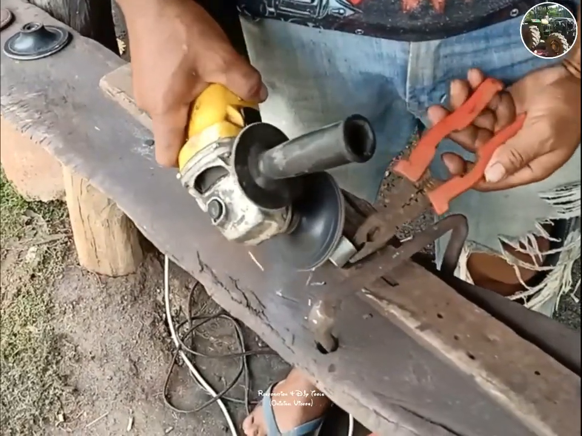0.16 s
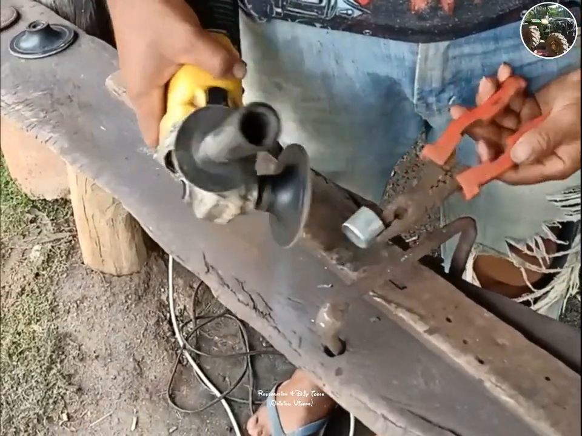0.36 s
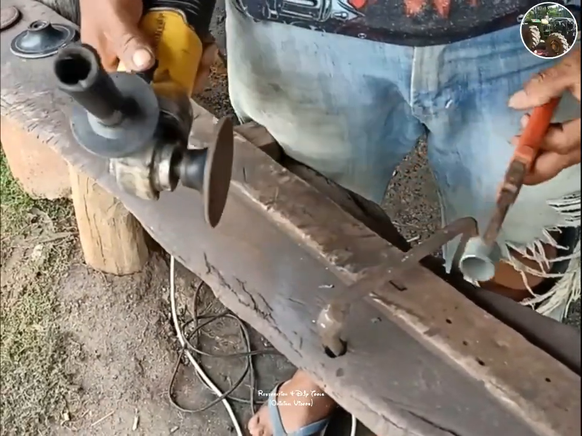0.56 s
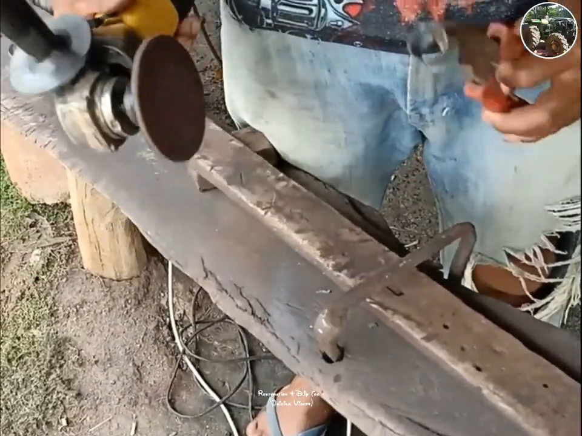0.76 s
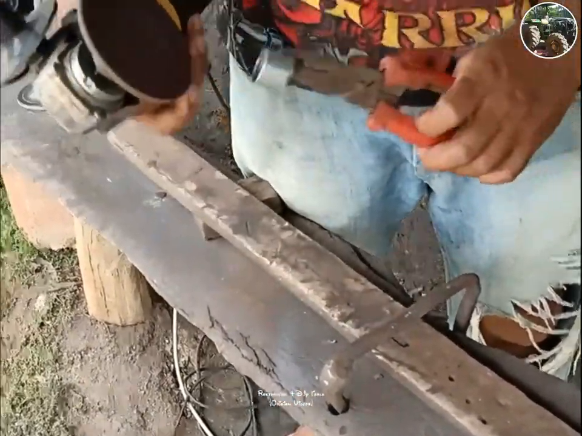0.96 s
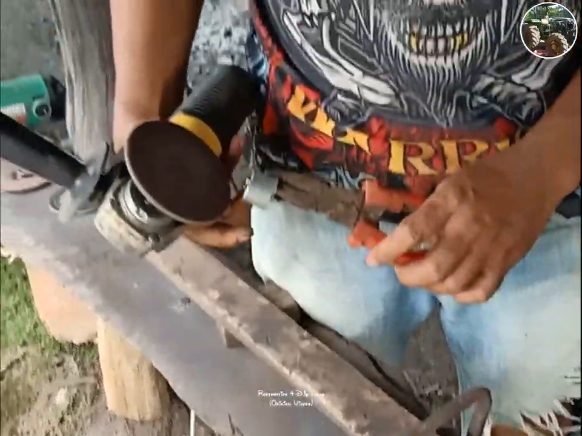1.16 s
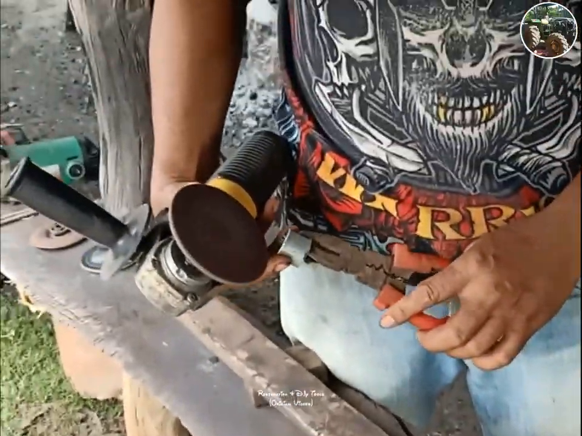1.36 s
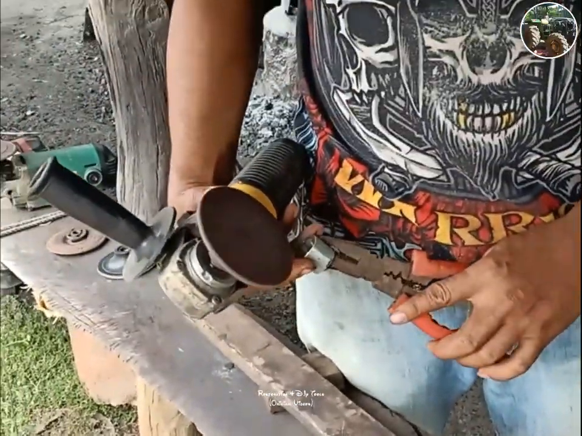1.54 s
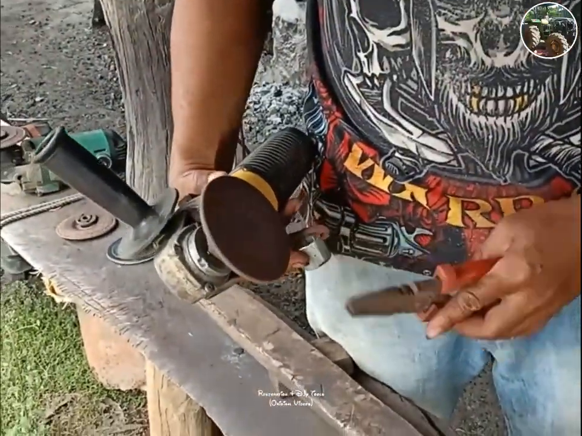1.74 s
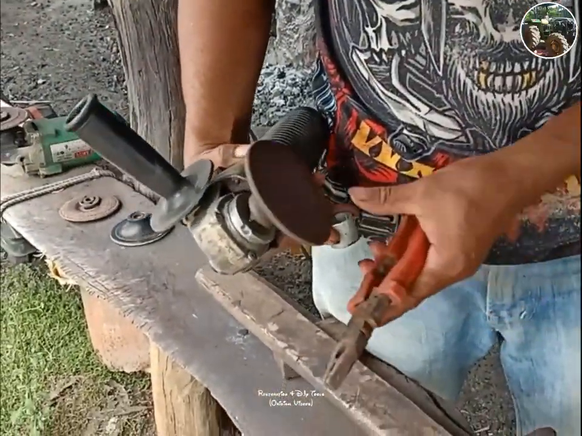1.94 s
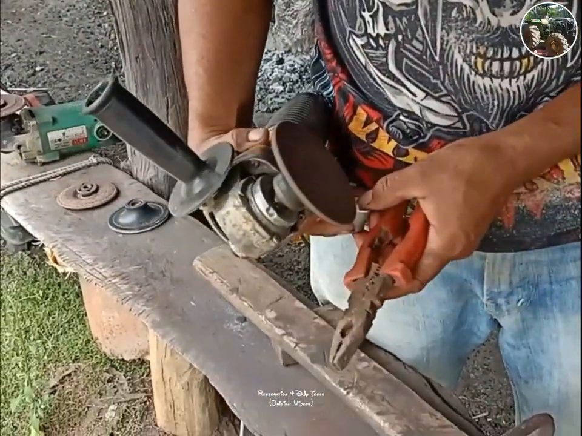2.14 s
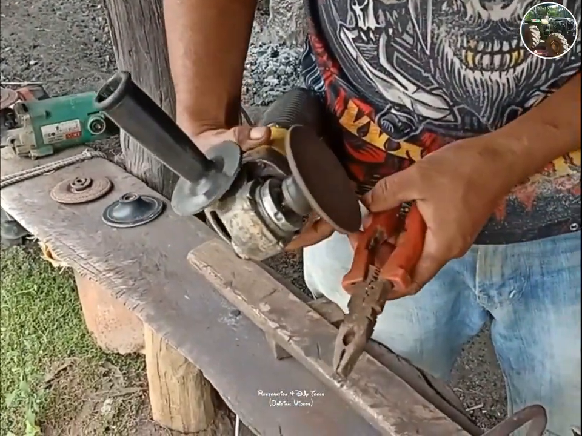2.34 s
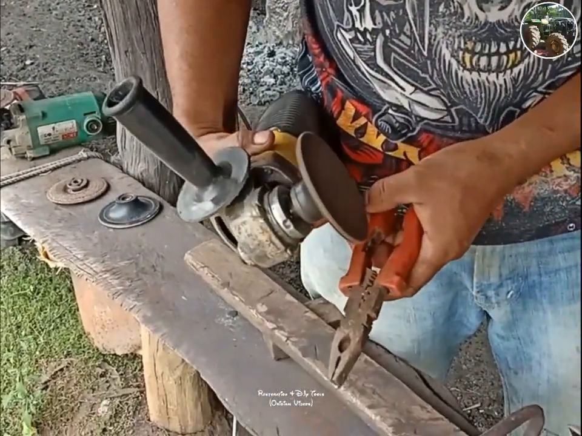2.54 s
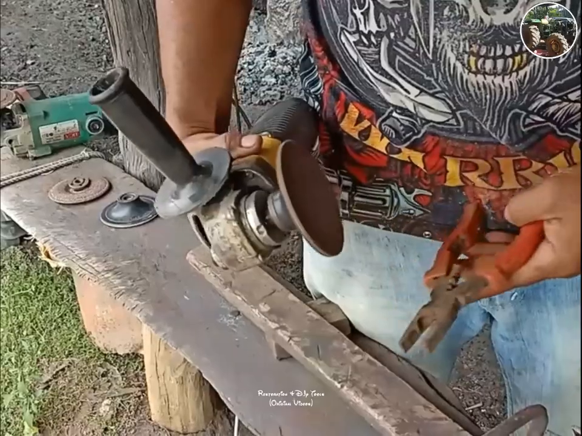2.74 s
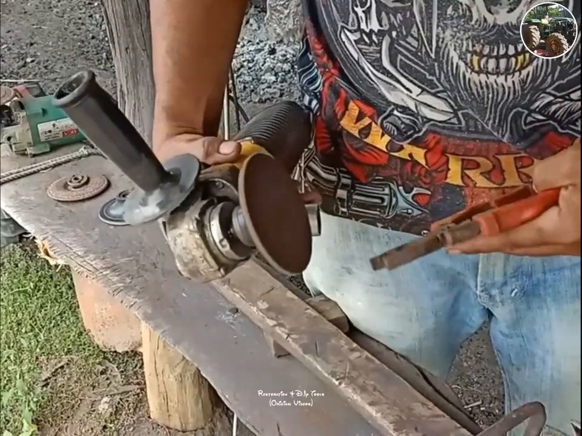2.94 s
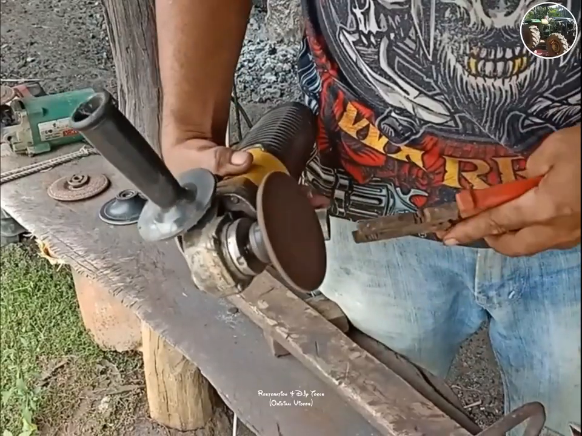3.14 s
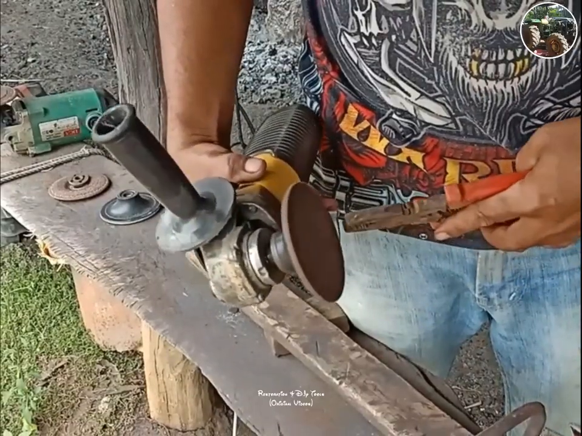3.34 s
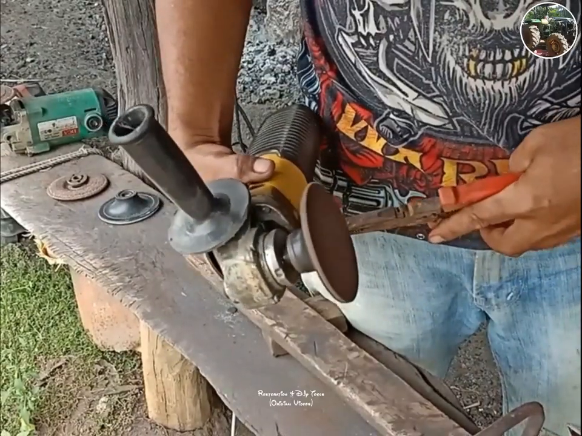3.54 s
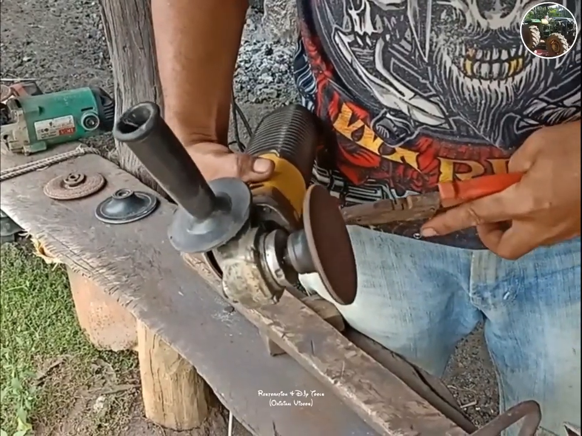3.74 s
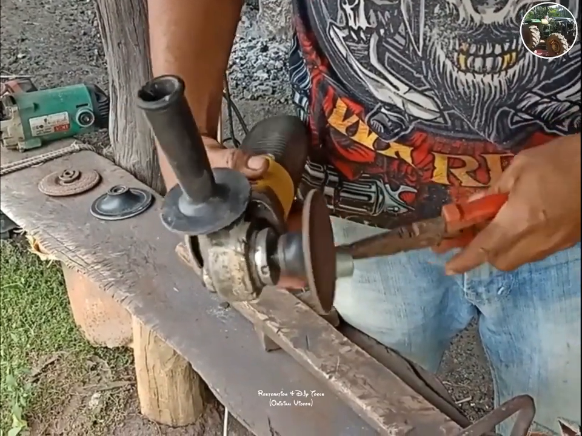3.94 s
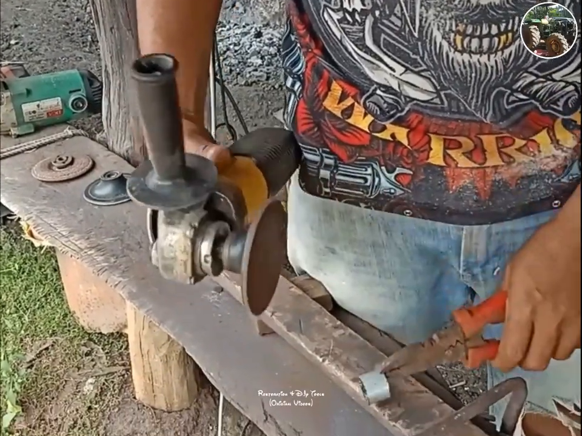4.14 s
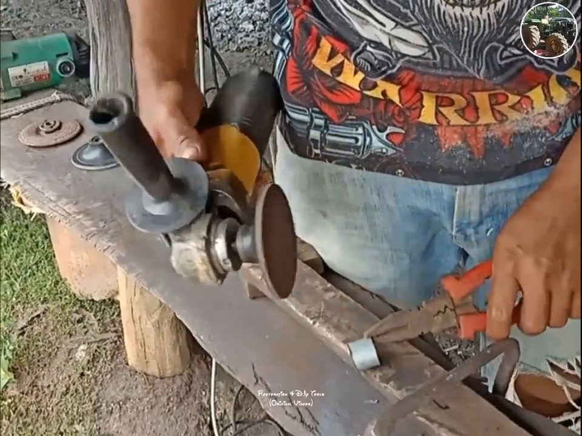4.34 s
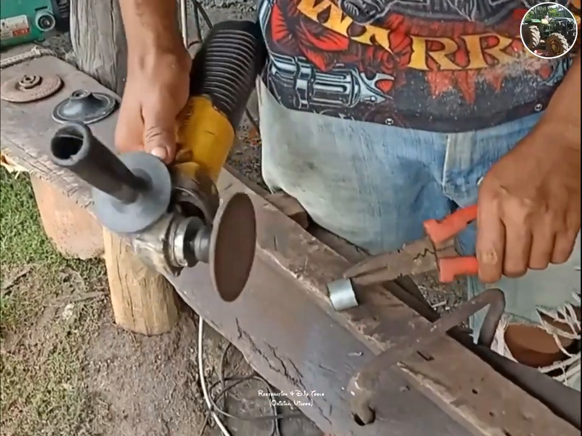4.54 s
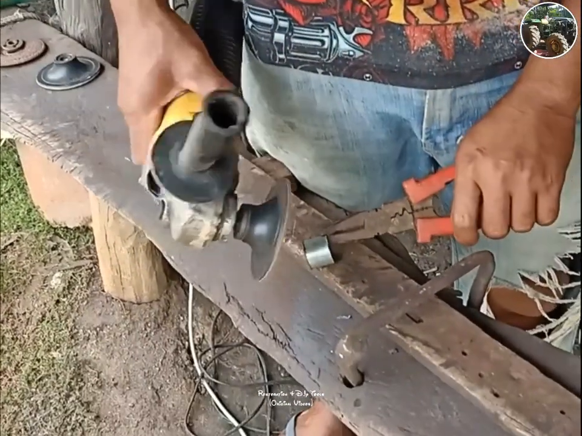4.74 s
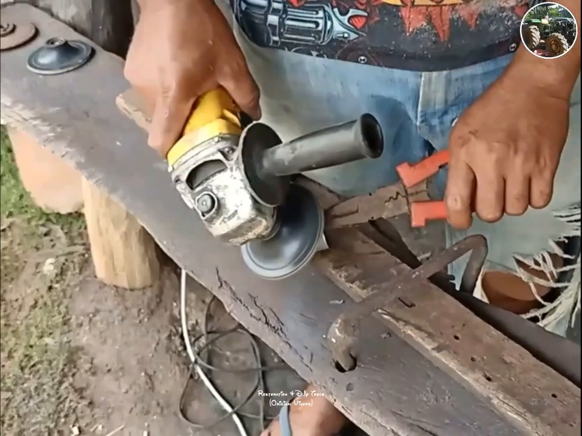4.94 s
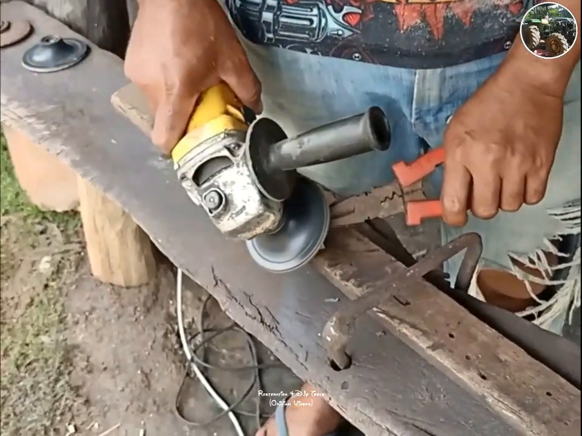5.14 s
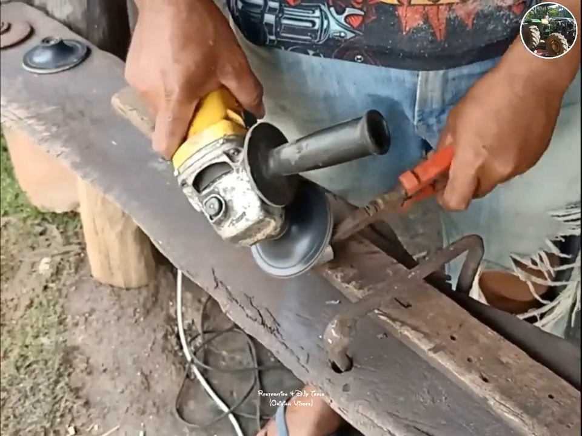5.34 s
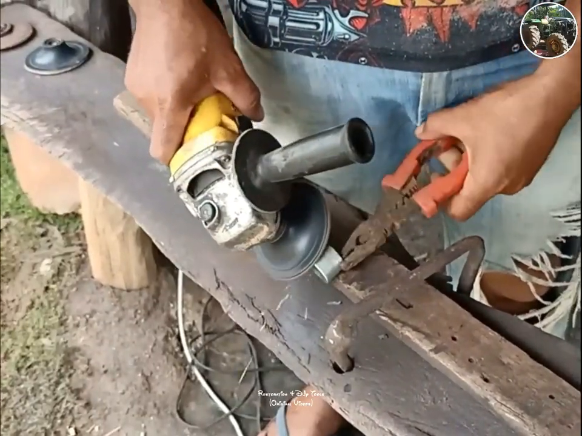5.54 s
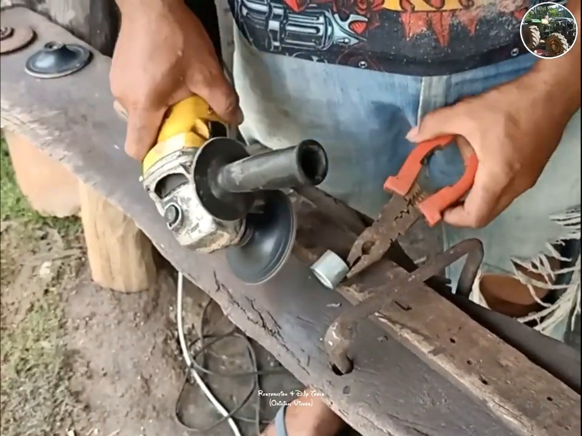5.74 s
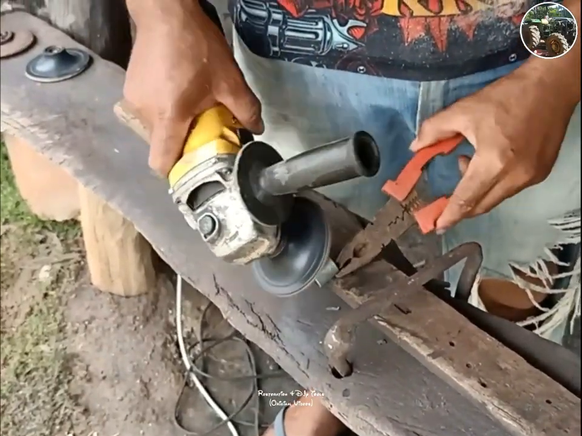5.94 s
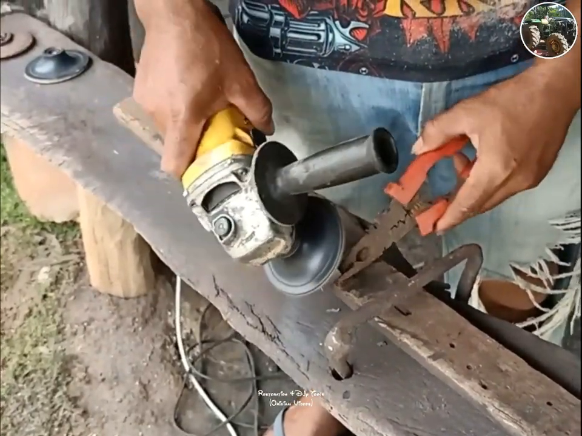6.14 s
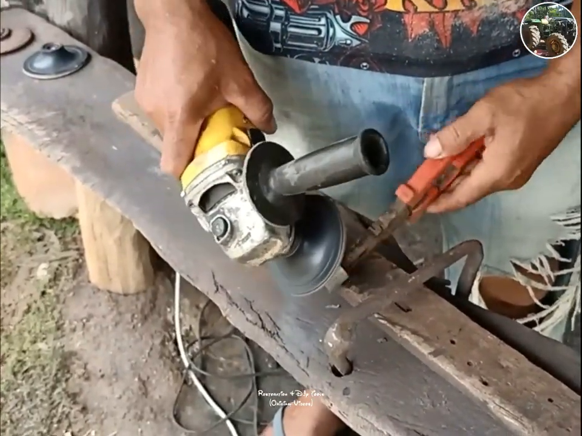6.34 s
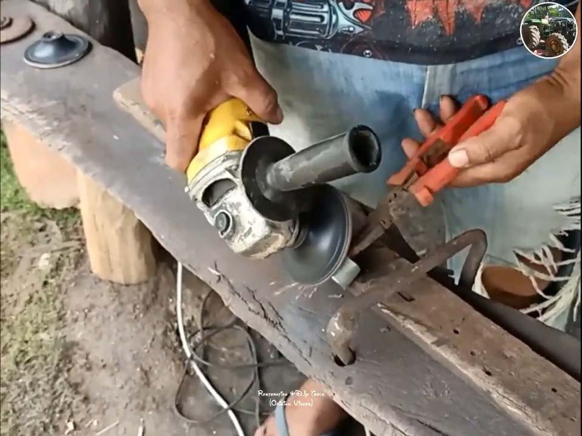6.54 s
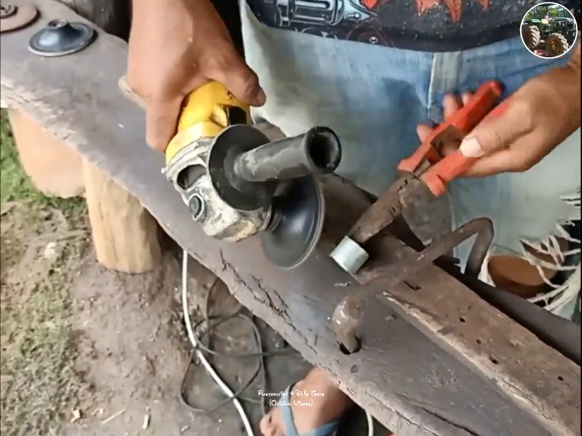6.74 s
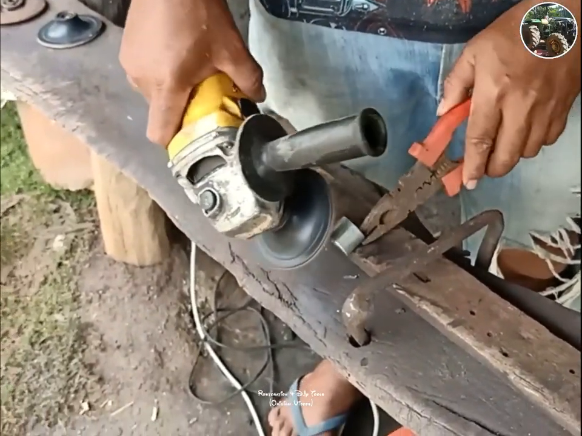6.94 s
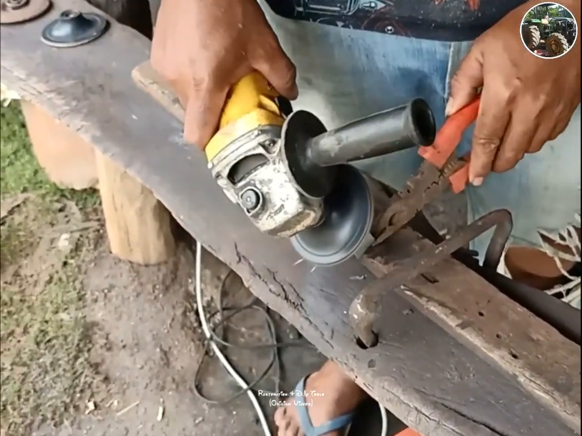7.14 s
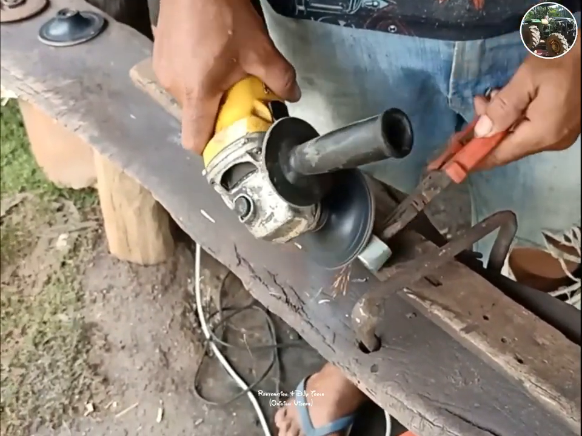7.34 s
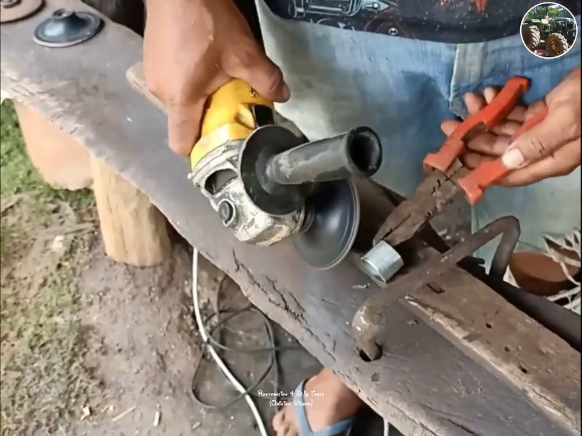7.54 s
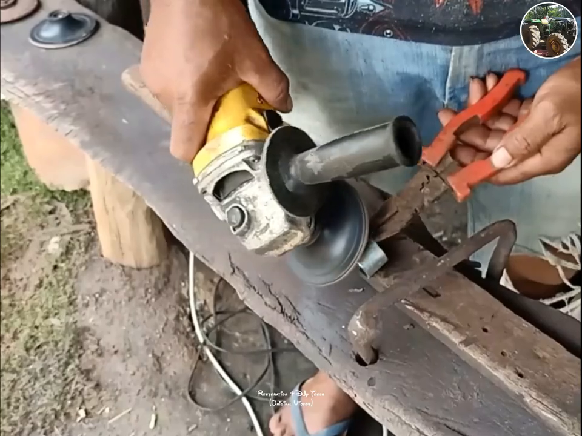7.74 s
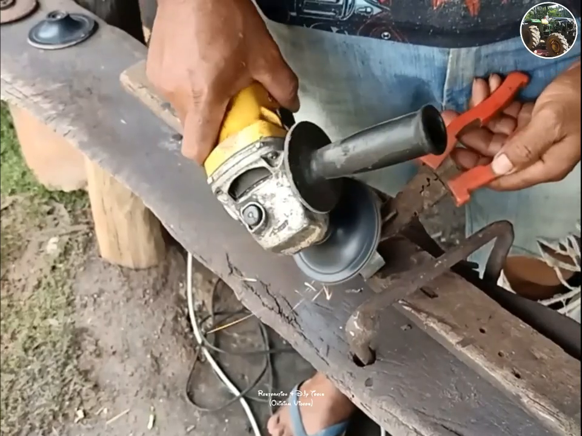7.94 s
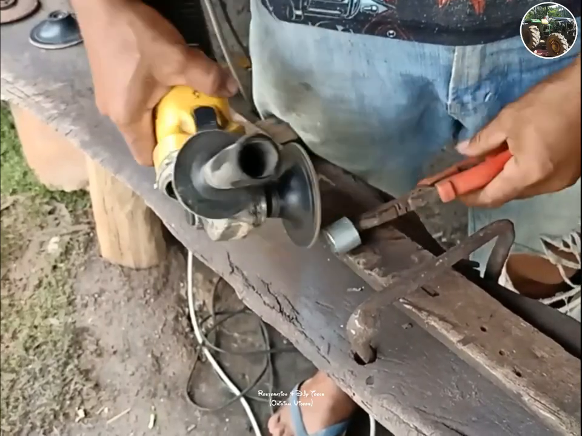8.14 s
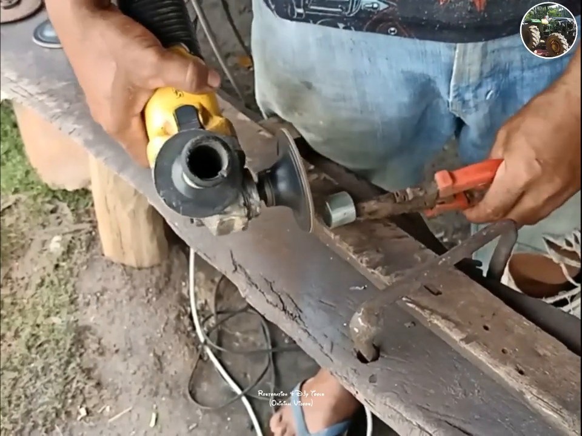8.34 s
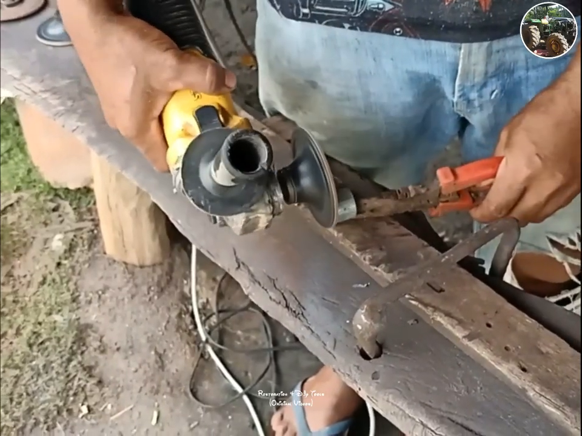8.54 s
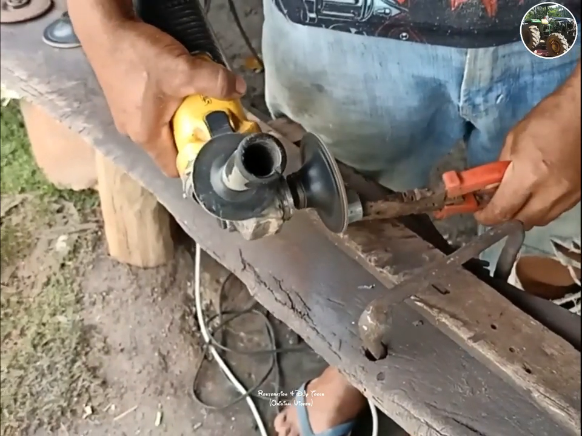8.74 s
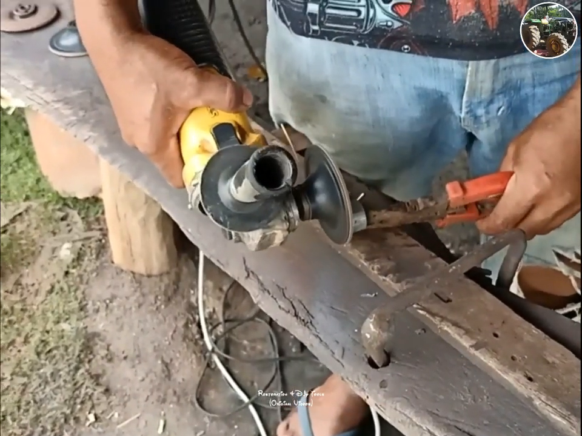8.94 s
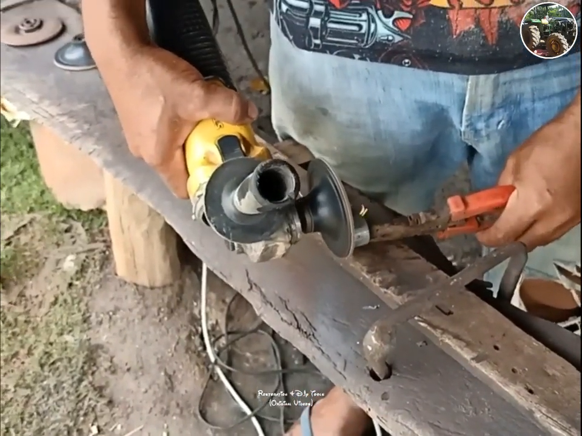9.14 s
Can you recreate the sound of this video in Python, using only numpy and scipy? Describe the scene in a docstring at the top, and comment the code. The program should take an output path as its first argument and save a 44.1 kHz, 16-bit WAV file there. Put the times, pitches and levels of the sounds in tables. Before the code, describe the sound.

Close, dry stereo outdoors. An angle grinder is already at full speed, all rushing air, bright brush hiss and a whistling whine, with a gritty buzz as its disc touches a small steel ring until about 0.3 s. At 0.6 s it is switched off and coasts down slowly, the whine gliding lower and the noise thinning into loose gear ticks and chatter around 0.8-1.1 and 3 s. Pliers clink and scuff between 1.3 and 2.3 s. A distant motorbike drones by around 2 s, another near 4.3 s, over faint road murmur. Gear knocks cluster at 3.5-3.7 s; a hard tick lands at 4.2 s. At 4.5 s a sharp clack and jolt restart the motor, which sweeps up within a second. From 5.3 s to the end at 9.2 s come short rasping touches, the motor sagging slightly, with low bench rumble; after 8.2 s the grinding is duller and the whistle stronger.

```python
"""An angle grinder with a sanding disc runs at an open-air bench, dressing a small steel ring held in pliers.
Shaped noise makes its gear case, housing, air and hiss; tones locked to the rotor make its whistle and whine.
Switched off, it coasts down, the whine sinking and the gears rattling loose, while struck modes clink as pliers.
It restarts with a jolt, and the ring is touched to the disc again and again as slap tones and grit.
Two motorbikes, stacks of wavering exhaust tones, pass in the distance over a road murmur."""
import sys
import numpy as np
from scipy import signal
from scipy.fft import rfft, irfft, next_fast_len
from scipy.io import wavfile
from scipy.ndimage import uniform_filter1d

SR = 44100
rng = np.random.default_rng(int(sys.argv[2]) if len(sys.argv) > 2 else 0)


def wav_out(sig):
    """Save sig, one row per channel (or a flat mono array), as 16-bit PCM at SR to the path in sys.argv[1]."""
    wavfile.write(sys.argv[1], SR, np.round(np.clip(np.atleast_2d(sig).T, -1, 1) * 32767).astype(np.int16))


N = 405279
TIME = np.arange(N) / SR


def from_db(db):
    """Decibels to gain."""
    return 10 ** (np.asarray(db) / 20)


def rms_one(x):
    """Scale to rms 1."""
    return x / np.sqrt(np.mean(x ** 2) + 1e-20)


def over_time(points):
    """Automation curve from (time, value) points."""
    s, value = np.transpose(points)
    return np.interp(TIME, s, value)


def at_hz(points, hz):
    """Read a spectrum on a log-frequency axis."""
    f, value = np.transpose(points)
    return np.interp(np.log(hz), np.log(f), value)


def drift(rate):
    """Smooth chance with spread 1 that changes about rate times a second."""
    knots = rng.standard_normal(4096)
    return rms_one(np.interp(TIME * rate % 4095, np.arange(4096), knots))


def colour(x, spectrum):
    """EQ a signal with a spectrum curve."""
    size = next_fast_len(N)
    hz = np.maximum(np.arange(size // 2 + 1) * SR / size, 1)
    return irfft(rfft(x, size) * from_db(at_hz(spectrum, hz)), size)[..., :N]


def spread(mid, side):
    """Left and right from middle and difference."""
    return np.array([mid + side, mid - side])


# stereo width of the noise layers: f/Hz, side-minus-mid level/dB
STEREO_WIDTH = [(60, 3), (130, -12), (290, -8.5), (640, -4.5), (1410, -5.5), (3100, -5), (6820, 2),
                (15000, -0.5)]


def stereo_noise():
    """White middle noise plus independent side noise, whose level sets the width at each frequency."""
    return spread(rng.standard_normal(N), colour(rng.standard_normal(N), STEREO_WIDTH))


def resonate(x, modes):
    """Parallel resonances with steep skirts; rms 1."""
    out = 0
    for hz, width_hz, db in modes:
        edges = [hz - width_hz / 2, hz + width_hz / 2]
        band = signal.butter(2, edges, "band", fs=SR, output="sos")
        out = out + from_db(db) * rms_one(signal.sosfilt(band, x))
    return rms_one(out)


def ring(x, modes):
    """Struck modes of a small steel part, which radiates no bass."""
    out = 0
    for hz, db, t60 in modes:
        r = from_db(-60 / (t60 * SR))
        w = 2 * np.pi * hz / SR
        mode = signal.lfilter([0, np.sin(w)], [1, -2 * r * np.cos(w), r * r], x + 1e-18)
        out = out + from_db(db) * mode
    return signal.sosfilt(signal.butter(2, [700, 10500], "band", fs=SR, output="sos"), out)


def bursts(clicks, decay_s):
    """Each click opens an envelope that dies away."""
    return signal.lfilter([1], [1, -np.exp(-1 / (decay_s * SR))], clicks + 1e-18)


def click_train(events):
    """One click of the given height per (time, dB) event."""
    out = np.zeros(N)
    for s, db in events:
        out[round(s * SR)] += from_db(db)
    return out


def swells(rows):
    """Bell-shaped swells of level from rows of (middle s, half-length s, dB)."""
    return sum(from_db(db) * np.exp(-((TIME - s) / half_s) ** 2) for s, half_s, db in rows)


def tone(turns, waver_db, width):
    """A stereo sine of rms 1 whose strength and direction waver."""
    angle = (2 * np.pi * (turns % 1)).astype(np.float32)
    image = spread(np.sin(angle), width * drift(1.62) * np.cos(angle))
    return rms_one(from_db(waver_db * drift(14)) * image)


def rough_tone(turns, rough, waver_db, width):
    """A tone whose phase and strength flutter quickly, so that its line frays."""
    frayed = tone(turns + rough * drift(170) / (2 * np.pi), waver_db, width)
    return rms_one(frayed * from_db(5 * rough * drift(110)))


def lag(x, time_s):
    """Follow a control with a delay."""
    keep = np.exp(-1 / (time_s * SR))
    return signal.lfilter([1 - keep], [1, -keep], x + 1e-18)


PRESS_S, LIFT_S = 0.0302, .07  # the contact builds up and lets go
SAG_LAG_S = .25  # the rotor's inertia delays the slowing
# the ring is touched to the disc: start t/s, length t/s, rub level/dB, slowing before the lag/turns per s,
# bench rumble level/dB
RING_TOUCHES = [(0.0, 0.26, -53, 11, -70), (5.298, 0.19, -55, 5, -75), (5.607, 0.096, -68, 7.5, -55),
                (6.111, 0.1, -49, 7.5, -51.5), (6.231, 0.44, -56, 5, -57), (6.918, 0.21, -62, 0, -46),
                (7.171, .32, -57, 6, -43.5), (7.888, 0.15, -53.5, 9.5, -49), (8.653, 0.2, -58.5, 6.5, -62),
                (8.892, 0.37, -57.5, 11, -76)]


def touches():
    """Rub, drag on the motor and bench rumble: each touch builds up, holds and lets go."""
    rub, drag, rumble = np.zeros((3, N))
    for start, length, rub_db, slowing, rumble_db in RING_TOUCHES:
        pressed = np.clip((TIME - start) / PRESS_S, 0, 1)
        released = np.exp(-np.clip((TIME - start - length) / LIFT_S, 0, 30))
        held = pressed * released
        rub = np.maximum(rub, from_db(rub_db) * held)
        drag = np.maximum(drag, slowing * held)
        rumble = np.maximum(rumble, from_db(rumble_db) * held)
    return rub, lag(drag, SAG_LAG_S), rumble


SWITCH_OFF_S, SWITCH_ON_S = .57, 4.536  # the switch is let go, and pressed again
FREE_SPEED = 474.5  # motor running free, rotor turns per s
DRAG_KNEE = 216  # turns per s at which air drag equals bearing friction
COAST_S = 4.855  # time scale of the run-down
# run-up: share of the missing speed, time constant t/s
RUN_UP_STAGES = [(.38, .05), (.62, .29)]


def rotor_speed(drag):
    """The motor sags under load, coasts against air drag and friction, then runs up again."""
    running = FREE_SPEED - drag
    released = np.arctan(running[round(SWITCH_OFF_S * SR)] / DRAG_KNEE)
    coasted_s = np.clip(TIME, SWITCH_OFF_S, SWITCH_ON_S) - SWITCH_OFF_S
    coasting = DRAG_KNEE * np.tan(released - coasted_s / COAST_S)
    since = np.maximum(TIME - SWITCH_ON_S, 0)
    missing = sum(share * np.exp(-since / time_s) for share, time_s in RUN_UP_STAGES)
    return np.where(TIME < SWITCH_OFF_S, running, running + missing * (coasting - running))


def after_start(decay_s, rise_s=.04):
    """Builds up quickly when the switch is pressed, then dies away."""
    since = np.maximum(TIME - SWITCH_ON_S, 0)
    return np.minimum(since / rise_s, 1) * np.exp(-since / decay_s)


def rolled(at_s=8.2, time_s=.06):
    """Rises to 1 as the tool is rolled over and its gear case points away."""
    return .5 + .5 * np.tanh((TIME - at_s) / time_s)


def lifted(at_s=.97, half_s=.32):
    """Near 1 while the tool is lifted and swung round, vents forward."""
    return np.exp(-((TIME - at_s) / half_s) ** 4)


# how squarely the vents face the listener as the tool is turned in the hand: t/s, level/dB
VENT_FACING = [(0, 0), (.42, 0.4), (.72, 0), (1.25, 2), (1.95, 2), (3.1, 2), (3.85, 2.5), (4.7, 2.5),
               (4.93, 2), (5.08, 1), (5.55, 0.1), (5.85, 1.3), (6.2, 0.03), (7.02, 1), (7.6, -0.5),
               (8.45, 1), (8.8, 0.5), (9.19, 0.5)]
JOLT, JOLT_S = 0.54, 0.064  # starting current's jolt: share of full effort before its rise and decay; decay


def part_db(law, speed, load):
    """Level of one part of the machine from its speed, the way it faces and the load on the disc."""
    full_db, power, facing_share, load_db = law
    effort = speed / FREE_SPEED + JOLT * after_start(JOLT_S)
    return full_db + power * 20 * np.log10(effort) + facing_share * over_time(VENT_FACING) + load_db * load


def rattle(speed, hits_per_turn, size_db, decay_s, smooth):
    """Envelope of tooth impacts: dense at speed, falling apart into single ticks as the gears slow."""
    rate = hits_per_turn * speed * (speed / FREE_SPEED)  # hits per s
    sizes = from_db(size_db * np.clip(rng.standard_normal(N), -2, 1.5))
    hits = (rng.random(N) < rate / SR) * sizes
    power = bursts(hits, decay_s)
    local_power = uniform_filter1d(power, SR // 12)
    return np.sqrt(smooth + power / (local_power + 1e-9))


# gear case and motor housing resonances: f/Hz, width f/Hz, relative level/dB
CASE_MODES = [(1270, 405, -5), (1910, 360, 0.5), (2042, 300, -1.5), (3270, 1200, -39), (4306, 350, -0.5)]
HOUSING_MODES = [(3376, 620, 0.5), (3720, 590, 1), (4425, 970, 4)]
# their response: full-speed level before trims/dB, power of speed, share of facing, firm-touch boost/dB
CASE_RESPONSE = (-38, 0.74, 1.07, 4.5)
HOUSING_RESPONSE = (-32.5, 1.3, 2.5, -0.5)
SHAKE_DB, SHAKE_S = 13.5, 0.082  # the starting current shakes the gears: boost before rise and decay; decay


def gear_body(speed, load, teeth):
    """Gear impacts drive noise through the resonances of gear case and housing."""
    case_db = part_db(CASE_RESPONSE, speed, load) - 2
    case_db = case_db + SHAKE_DB * after_start(SHAKE_S) - 6.5 * rolled()
    case = from_db(case_db) * resonate(stereo_noise() * teeth, CASE_MODES)
    housing_db = part_db(HOUSING_RESPONSE, speed, load) - 5.5 - 0.91 * speed / FREE_SPEED - 7 * lifted()
    return case + from_db(housing_db) * resonate(stereo_noise() * teeth, HOUSING_MODES)


def gliding_rush(centre_hz, width_hz):
    """A band of air noise that follows a moving centre frequency; rms 1."""
    low = signal.butter(2, width_hz / 2, fs=SR, output="sos")
    a, b = signal.sosfilt(low, rng.standard_normal((2, 2, N)))
    angle = 2 * np.pi * np.cumsum(centre_hz) / SR
    mid, side = a * np.cos(angle) + b * np.sin(angle)
    return rms_one(spread(mid, 0.42 * side))


# the centre of a gliding band of air noise, which shifts as the tool moves: t/s, f/Hz
RUSH_CENTRE = [(0, 4166), (.5, 4570), (.66, 4614), (.84, 3780), (1.06, 3560), (1.26, 4546), (1.42, 3553),
               (2.05, 3483), (2.4, 4616), (4.68, 4580), (4.77, 3038), (5.1, 3530), (6.4, 3628), (7, 4234),
               (7.7, 4003), (8.3, 3950), (8.8, 4246), (9.19, 3934)]
# cooling fan's whistle: multiple of rotor speed, relative level/dB
FAN_ORDERS = [(6, -2), (8, -5)]
# broad rush of air: f/Hz, relative level/dB
AIR_SPECTRUM = [(30, -46), (100, -26.5), (250, -5), (550, -9.5), (800, -7.5), (1150, 3), (1500, -2.5),
                (2100, 2), (2650, 1.5), (3300, 7), (4400, 3), (6000, -5.5), (9000, -3.5), (15000, -44)]


def rushing_air(speed, load, teeth):
    """The fan blows noise through a band whose peak glides as the tool moves, and its blades churn a band
    around their whistle."""
    housing_db = part_db(HOUSING_RESPONSE, speed, load)
    flow = speed / FREE_SPEED
    blowing = flow ** .6
    # rolled over, this band lifts a little
    band_db = housing_db - 7 + 3 * lifted() + 1.5 * rolled()
    moving_band = from_db(band_db) * blowing * np.sqrt(teeth) * gliding_rush(over_time(RUSH_CENTRE), width_hz=720)
    blades = from_db(housing_db - 11) * flow ** 2 * gliding_rush(FAN_ORDERS[0][0] * speed, width_hz=580)
    air = from_db(housing_db - 1.5) * blowing * rms_one(colour(stereo_noise() * teeth, AIR_SPECTRUM))
    return moving_band + blades + air


# brush hiss: f/Hz, relative level/dB
HISS_SPECTRUM = [(3060, -37), (5200, 0), (6100, -2), (7700, -0.5), (8800, 4), (9510, 6), (10200, 2.5),
                 (11100, -4.5), (12700, -11), (15500, -17.5)]
# its response: full-speed level before the treble curve/dB, power of speed, share of facing, firm-touch boost/dB
HISS_RESPONSE = (-30.5, 1.79, 0.96, 1.2)
# the treble rises and falls: t/s, relative level/dB
TREBLE_LEVEL = [(0, -2.5), (.2, 0), (.55, -1.5), (.9, 1.5), (1.25, -3), (1.55, -1.5), (2.0, -2),
                (2.3, -0.5), (3.1, -0.5), (4.1, 5), (4.5, 8), (4.62, -1.5), (5.1, 1), (5.7, -0.5), (6.1, 0),
                (6.7, -2), (7.1, -0.5), (7.4, .5), (7.65, -4), (7.95, 1.5), (8.4, -2), (8.7, 0),
                (9.19, -0.5)]


def brush_hiss(speed, load):
    """The brushes spit bright noise that is roughened by dense sparks."""
    sparks = rattle(speed, hits_per_turn=4.7, size_db=11.5, decay_s=0.0029, smooth=0.5)
    # the hiss smooths out at low speed
    roughness = np.minimum(2 * (speed / FREE_SPEED) ** 2, 1)
    sparks = 1 + roughness * (sparks - 1)
    hiss_db = part_db(HISS_RESPONSE, speed, load) + over_time(TREBLE_LEVEL) + 1.24 * drift(14)
    return from_db(hiss_db) * rms_one(colour(stereo_noise() * sparks, HISS_SPECTRUM))


def machine_noise(speed, load, slap):
    """Gear impacts ring the case and housing; the fan and brushes add rushing air and hiss."""
    teeth = rattle(speed, hits_per_turn=14.0, size_db=15.0, decay_s=0.004, smooth=0.84)
    noise = gear_body(speed, load, teeth) + rushing_air(speed, load, teeth) + brush_hiss(speed, load)
    # the load on the gears wanders in the hand
    return noise * slap * from_db(.5 * drift(16))


def bench_echo(x, delay_s=.0013, swing=.07, share=.25):
    """The bench top throws the sound back, with a delay that shifts as the tool moves."""
    sway = drift(2.5)
    delays = [delay_s * (1 + swing * (sway + .2 * drift(2))) for _ in x]
    echo = np.array([np.interp(TIME - delay, TIME, side, left=0) for delay, side in zip(delays, x)])
    return (x + share * echo) / np.hypot(1, share)


# whistle response: full-speed level before aim and order/dB, power of speed, share of facing, firm-touch change/dB
WHISTLE_RESPONSE = (-41.5, 11, 1, -2)
# the whistle beams, so its level changes as the tool is aimed: t/s, relative level/dB
WHISTLE_BEAM = [(0, -2), (.5, 1), (.7, -7), (5.2, -2), (6.1, 0), (6.5, 0.5), (7.05, 2.5), (7.3, -3.5),
                (7.7, 1.5), (8.2, 1), (8.6, 6.5), (9.19, 5)]


def fan_whistle(speed, load, turns):
    """Blade-passing tones, strong only near full speed."""
    out = 0
    whistle_db = part_db(WHISTLE_RESPONSE, speed, load) + over_time(WHISTLE_BEAM)
    for order, db in FAN_ORDERS:
        out = out + from_db(whistle_db + db) * rough_tone(order * turns, rough=.35, waver_db=2.0, width=0.29)
    return out


# rotor tones before facing and fading: multiple of rotor speed, running level/dB, coasting level/dB
ROTOR_ORDERS = [(2, -49, -53), (4, -58, -51.5), (8, -66, -53), (9, -54, -56), (10, -55, -66)]


def rotor_tones(speed, turns, powered):
    """Gear tones fade as the rotor slows, and so small a body hardly radiates low ones."""
    out = 0
    fading = np.clip((speed - 140) / 240, 0, 1)
    for order, run_db, coast_db in ROTOR_ORDERS:
        radiated = 1 / np.sqrt(1 + (760 / (order * speed)) ** 12)
        level_db = coast_db + powered * (run_db - coast_db) + over_time(VENT_FACING)
        rough = .22 * np.sqrt(order / 2)
        out = out + fading * radiated * from_db(level_db) * rough_tone(order * turns, rough, waver_db=2.5, width=0.49)
    return out


# commutator and slot whine, before the housing path and speed fade: multiple of rotor speed,
# level in the housing's lower resonance/dB, level in its upper one/dB
WHINE_ORDERS = [(24, -45, -45), (26, -47, -50), (32, -60, -49), (40, -62, -48), (48, -62, -43.5),
                (56, -62, -46.5), (64, -66, -51), (72, -66, -39.5), (80, -66, -46), (88, -66, -51),
                (96, -66, -42.5)]
# how the housing passes that whine: f/Hz, gain level/dB
HOUSING_PATH = [(1500, -28), (3000, -16), (4000, -11), (4400, 0), (4650, -1), (5000, -6), (5500, -20),
                (7400, -12), (8700, -12), (9100, -9), (9400, -1), (10000, 0), (10400, -6), (11000, -15),
                (12000, -27), (15000, -45)]


def motor_whine(speed, turns, powered):
    """High commutator orders sweep through the housing's resonances and die as the rotor nearly stops."""
    spinning = np.clip((speed - 92) / 14, 0, 1) * np.minimum(speed / 250, 1)
    # strong and rough under the starting current
    surge = (TIME > SWITCH_ON_S) * np.exp(-((TIME - SWITCH_ON_S - .3) / .19) ** 2)
    whine = from_db(-41) * surge * rough_tone(24 * turns, rough=.7, waver_db=1.0, width=.15)
    shaken = turns + (.0024 + .002 * powered) * drift(300)
    flutter = from_db(2.5 * drift(90))
    for order, lower_db, upper_db in WHINE_ORDERS:
        hz = order * speed
        db = np.interp(hz, [5200, 7400], [lower_db, upper_db]) + at_hz(HOUSING_PATH, hz)
        whine += from_db(db) * flutter * tone(order * shaken, waver_db=2.0, width=.15)
    return spinning * whine


def motor_tones(speed, load, turns):
    """Fan whistle, gear orders and commutator whine, all locked to the rotor."""
    powered = np.interp(TIME, [SWITCH_OFF_S, SWITCH_OFF_S + .3, SWITCH_ON_S, SWITCH_ON_S + .02], [1, 0, 0, 1])
    return (fan_whistle(speed, load, turns) + rotor_tones(speed, turns, powered)
            + motor_whine(speed, turns, powered))


def disc_hum(whirl, slap_turns):
    """The slightly warped disc hums twice a turn, strongest at full speed."""
    return from_db(-65) * whirl * tone(slap_turns, waver_db=7.5, width=0.56)


# the disc slaps the ring twice a turn: multiple of slap rate, level relative to the rub/dB
SLAP_ORDERS = [(1, -44), (2, -17.5), (3, -5), (4, -8), (5, -6), (6, 7), (7, 4.5), (8, 10), (9, 4),
               (16, -19)]
# grit dragged over steel: f/Hz, relative level/dB
GRIT_SPECTRUM = [(60, -42), (400, -37), (1200, -30), (2100, 6), (3000, 12), (5000, -36), (7500, -9),
                 (11000, -14), (15000, -5)]


def grinding(rub, slap_turns):
    """The disc's slaps buzz in ring and pliers, and every slap drags grit over the steel."""
    # rolled over, the disc hides the ring; only the lower tones bend round it
    hidden = from_db(-17 * rolled())
    buzz = 0
    for order, db in SLAP_ORDERS:
        shade = hidden if order > 7 else 1
        slap_tone = rough_tone(order * slap_turns, rough=order / 18, waver_db=2.5, width=0.18)
        buzz = buzz + from_db(db) * shade * slap_tone
    catching = from_db(3 * drift(70))  # the abrasive catches unevenly
    bite = catching * from_db(5.5 * np.cos(2 * np.pi * slap_turns))
    grit = rms_one(colour(stereo_noise() * bite, GRIT_SPECTRUM))
    return rub * (buzz + from_db(10) * np.sqrt(hidden) * grit)


# bench rumble: f/Hz, relative level/dB
BENCH_SPECTRUM = [(25, -40), (60, -27), (120, -7), (270, -4.5), (500, 0.5), (800, -3), (2000, -3),
                  (6000, -41)]


def bench_rumble(rumble):
    """The bench rumbles under the pliers: low noise that follows each touch."""
    return rumble * rms_one(colour(stereo_noise(), BENCH_SPECTRUM))


# motorbikes ease off as they go by: middle of the pitch fall t/s, firings per s, fall to each side per s,
# fall time t/s, loudest t/s, peak level before the exhaust orders/dB, swell t/s, fade t/s
BIKE_PASSES = [(2.25, 71.7, 13.3, 1.9, 2.02, -50.5, 0.58, 1.24),
               (4.75, 62.5, 5, .55, 4.29, -49, 0.41, 0.92)]
# their exhausts: multiple of firing rate, first bike relative level/dB, second bike relative level/dB
EXHAUST_ORDERS = [(1, -26.5, -36), (2, -3, -7), (3, -11.5, -11), (4, -11, -6), (5, -14, -7), (6, -12, -9),
                  (7, -13.5, -11.5), (8, -45, -14), (9, -22, -11.5)]
# road and tyre noise in the open: f/Hz, relative level/dB
OUTDOOR_SPECTRUM = [(25, -40), (60, -35), (100, -4), (270, -0.5), (480, -5), (800, -6), (2000, -3),
                    (6000, -40), (15000, -44)]
BIKE_FADE_DB = 15  # per tenfold of (1 + squared relative time from the loudest moment)
LEAVING_TILT_DB = 1.5  # brightness per octave, as their pipes come to point back
ROAD_DB, TYRES_DB = -59, 1  # steady murmur; tyre noise relative to the bikes


def motorbikes():
    """Far exhaust drones that swell, sink in pitch and fade, over the murmur of the road."""
    out = 0
    murmur_power = from_db(ROAD_DB) ** 2
    for k, (fall_at, firings, fall, fall_s, loudest_at, peak_db, swell_s, fade_s) in enumerate(BIKE_PASSES):
        leaving = (TIME - fall_at) / np.hypot(TIME - fall_at, fall_s)
        turns = np.cumsum((firings - fall * leaving) * (1 + 0.0014 * drift(25.36))) / SR
        half_s = np.where(TIME < loudest_at, swell_s, fade_s)
        level_db = peak_db - BIKE_FADE_DB * np.log10(1 + ((TIME - loudest_at) / half_s) ** 2)
        murmur_power = murmur_power + from_db(level_db + TYRES_DB) ** 2
        for order, *db in EXHAUST_ORDERS:
            gain = from_db(level_db + db[k] + LEAVING_TILT_DB * leaving * np.log2(order / 2))
            out = out + gain * tone(order * turns, waver_db=3.5, width=0.18)
    return out + np.sqrt(murmur_power) * rms_one(colour(stereo_noise(), OUTDOOR_SPECTRUM))


# gear modes: f/Hz, relative level/dB, t60 t/s
GEAR_MODES = [(2000, -3, 0.017), (2180, -5.5, 0.023), (3230, -13, .008), (4600, -3, 0.006),
              (7500, -14, .003), (9400, -8, .004)]
# gear teeth knock through their backlash, hardest at the start: t/s, strike level/dB, brightness/dB per octave
GEAR_KNOCKS = [(2.9178, -36, 1), (3.1516, -33, 2), (3.5408, -38, 4), (3.5777, -37, 5), (3.5951, -33, 4),
               (3.6246, -35, 3), (3.658, -35, 3), (3.6874, -34, 2), (4.112, -35, 0), (4.2034, -34, 4),
               (4.3192, -33, 0), (4.4439, -31, -1), (4.453, -32, -1), (4.4913, -29, -7),
               (4.5365, -19.5, -1), (4.5445, -22, -6), (4.5897, -20, -4)]
# without drive the gears break into fits of chatter: middle t/s, half-length t/s, level/dB
CHATTER_FITS = [(.83, 0.075, -32.5), (1.09, 0.095, -37.5), (2.93, 0.014, -39), (3.005, .027, -37.5),
                (3.152, 0.011, -38), (3.21, .02, -40), (3.272, .016, -38)]
# what rings in them: f/Hz, width f/Hz, relative level/dB
CHATTER_MODES = [(1390, 460, -9), (2000, 400, 1), (3530, 1000, -3.5), (4600, 600, -10), (9000, 2500, -5)]


def knocks(speed):
    """Hard tooth contacts ring the gears; with no drive, lighter ones tick on and break into fits of chatter."""
    loose = np.clip(1 - speed / FREE_SPEED, 0, 1)
    teeth = rattle(speed, hits_per_turn=7.0, size_db=6.0, decay_s=0.002, smooth=0.3)
    # -45.5 dB would be reached at standstill
    ticking = from_db(-45.5) * loose ** 2 * rms_one(ring(stereo_noise() * teeth, GEAR_MODES))
    chatter = swells(CHATTER_FITS) * resonate(stereo_noise() * teeth, CHATTER_MODES)
    hard = 0
    for hz, mode_db, t60 in GEAR_MODES:
        octaves = np.log2(hz / GEAR_MODES[0][0])
        strikes = click_train([(s, db + tilt * octaves) for s, db, tilt in GEAR_KNOCKS])
        hard = hard + ring(strikes, [(hz, mode_db, t60)])
    return ticking + chatter + hard


# pliers and ring clink: t/s, relative strike level/dB
CLINK_HITS = [(1.315, -23), (1.46, -22), (1.541, -30), (1.5471, -20.5), (1.555, -20.5), (1.816, -23),
              (1.8235, -36), (1.8284, -19), (1.8614, -23), (1.937, -29), (2.3229, -26.5)]
# pliers: f/Hz, relative level/dB, t60 t/s
PLIER_MODES = [(2100, -12, .02), (2780, -6, .022), (3250, -3, .016), (3500, -2, .016), (3980, -6, .018),
               (4400, -7, .018), (4750, -11, .02), (8700, -10, .015)]


def clinks():
    """Steel scuffs on steel; the hand damps the ring quickly."""
    band = signal.butter(2, [1200, 8000], "band", fs=SR, output="sos")
    scuff = signal.sosfilt(band, bursts(click_train(CLINK_HITS), decay_s=0.0039) * stereo_noise())
    return from_db(-21.5) * (ring(scuff, PLIER_MODES) + 2.1 * scuff)


# steel ring: f/Hz, relative level/dB, t60 t/s
RING_MODES = [(3200, -11, 0.022), (4290, -2.5, 0.016), (4480, -7, 0.018), (8400, -7, 0.012),
              (9200, -7, .014)]


def ring_tap(at_s=4.2435, strike_db=-21):
    """The ring is set against the bench: one short, hard tick."""
    return ring(click_train([(at_s, strike_db)]), RING_MODES)


# the disc grazes the steel: middle t/s, half-length t/s, level/dB
DISC_GRAZES = [(4.93, .06, -37), (5.88, .03, -38), (6.54, .018, -36), (7.02, .07, -40), (8.18, .03, -38)]


def grazes():
    """The edge of the disc brushes the steel with a short spit of grit."""
    band = signal.butter(2, [2800, 10000], "band", fs=SR, output="sos")
    spit = signal.sosfilt(band, stereo_noise() * from_db(4.7 * drift(280)))
    return swells(DISC_GRAZES) * rms_one(spit)


DISC_RATIO = 9 / 32  # disc turns per rotor turn
IDLE_RUB_DB = -60  # the free disc still flutters a little at full speed


def scene():
    """Grinder, workpiece and the yard around them."""
    rub, drag, rumble = touches()
    load = rub / rub.max()
    speed = rotor_speed(drag) * (1 + 0.001178 * drift(45))
    turns = np.cumsum(speed) / SR
    slap_turns = 2 * DISC_RATIO * turns
    whirl = (speed / FREE_SPEED) ** 4
    flutter = from_db(IDLE_RUB_DB) * whirl
    # contact shakes the whole machine in step with the slaps
    slap = 1 + 0.2 * load * np.cos(2 * np.pi * slap_turns)
    grinder = bench_echo(machine_noise(speed, load, slap)) + motor_tones(speed, load, turns)
    grinder = grinder + disc_hum(whirl, slap_turns) + knocks(speed)
    work = grinding(rub + flutter, slap_turns) + bench_rumble(rumble) + clinks() + ring_tap() + grazes()
    left, right = grinder + work
    # the bench is a little to the left: louder there, and one sample later on the right
    bench = np.array([from_db(0.35) * left, np.roll(right, 1)])
    return bench + motorbikes()


def record(dry):
    """The top is cut steeply above 15.8 kHz."""
    return signal.sosfilt(signal.ellip(12, .1, 80, 15800, fs=SR, output="sos"), dry)


dry = scene()
out = record(dry)
wav_out(out)
```